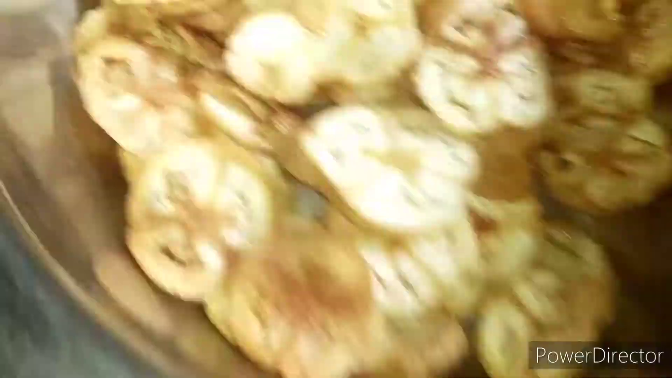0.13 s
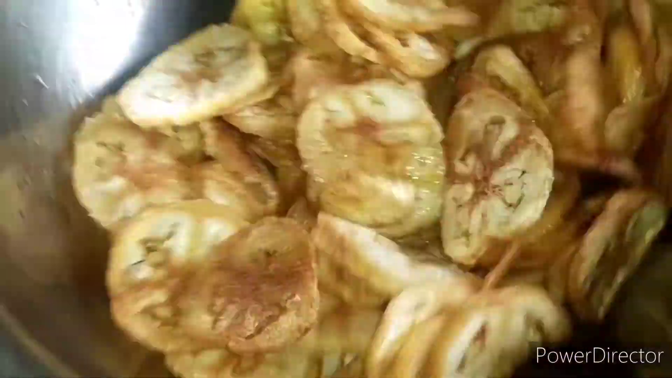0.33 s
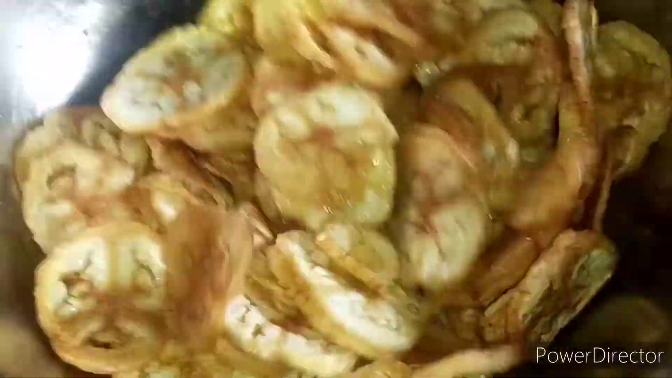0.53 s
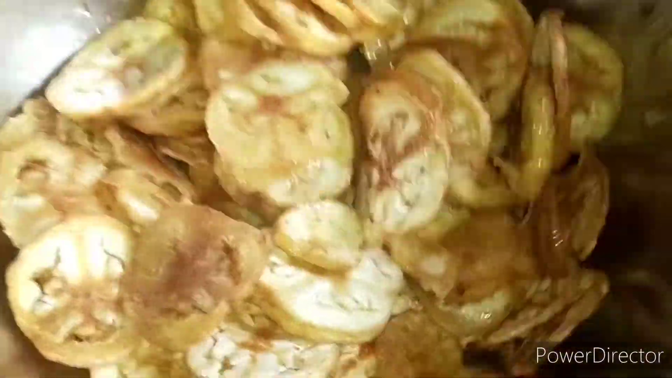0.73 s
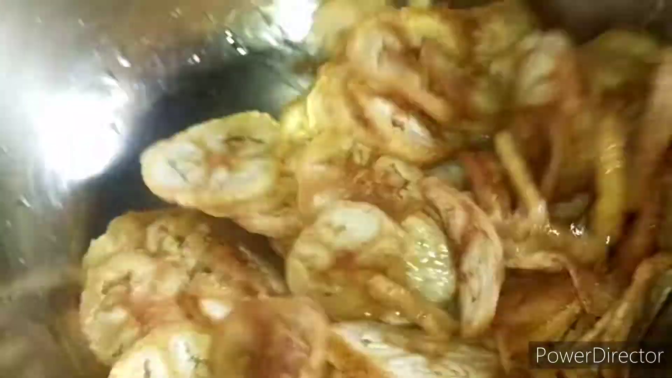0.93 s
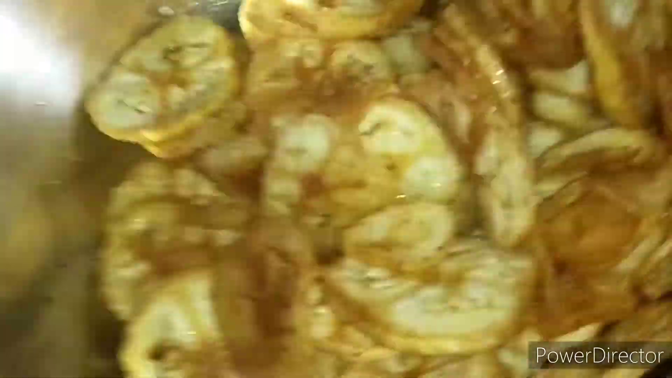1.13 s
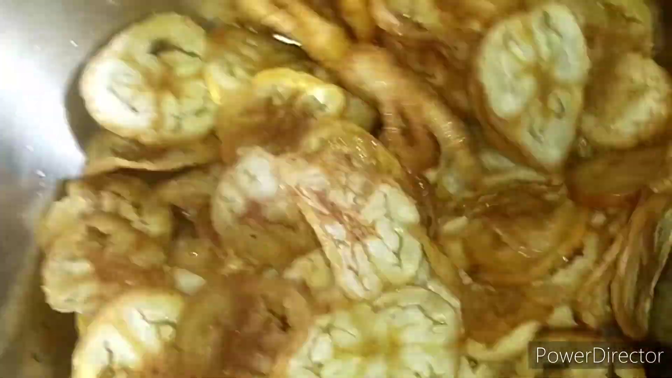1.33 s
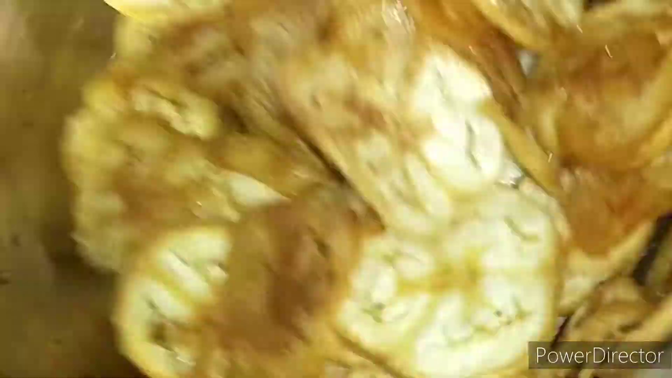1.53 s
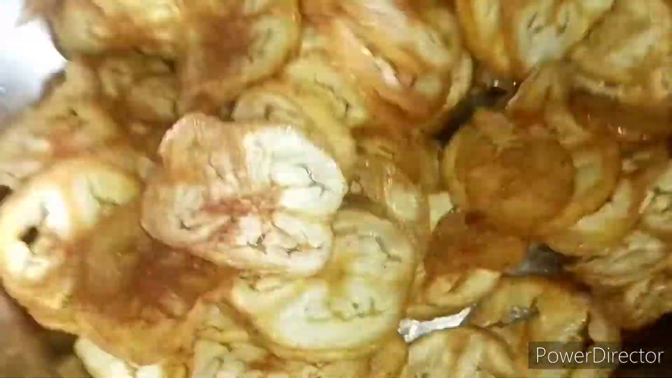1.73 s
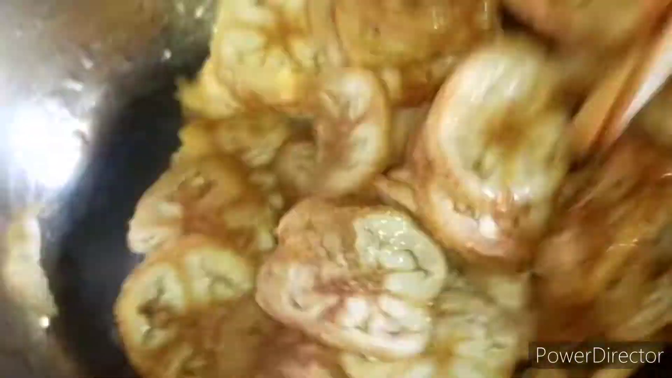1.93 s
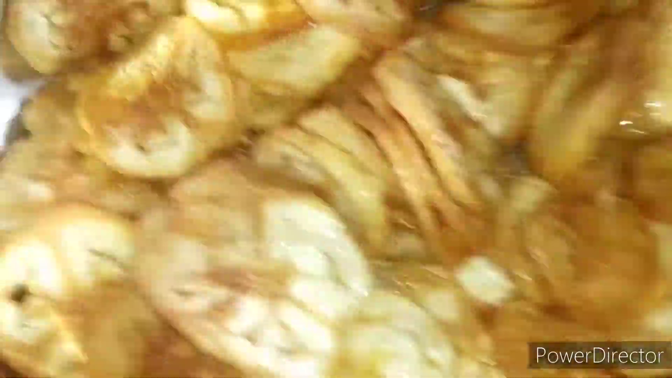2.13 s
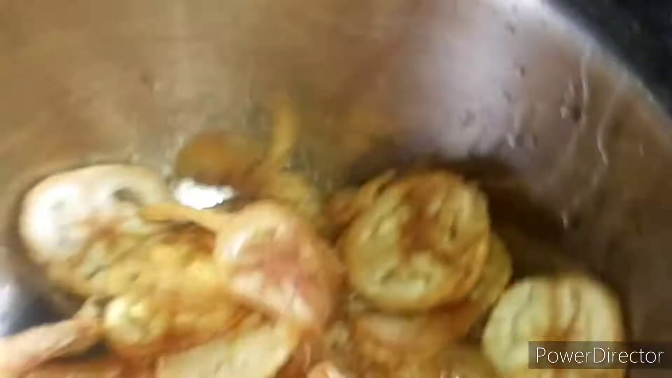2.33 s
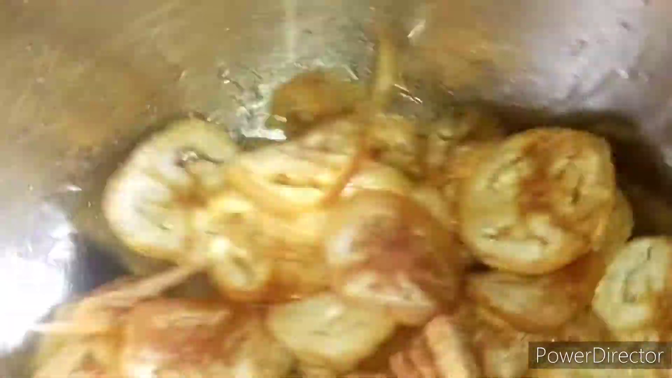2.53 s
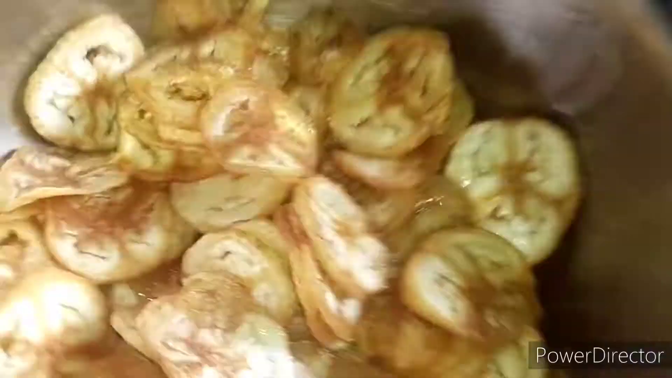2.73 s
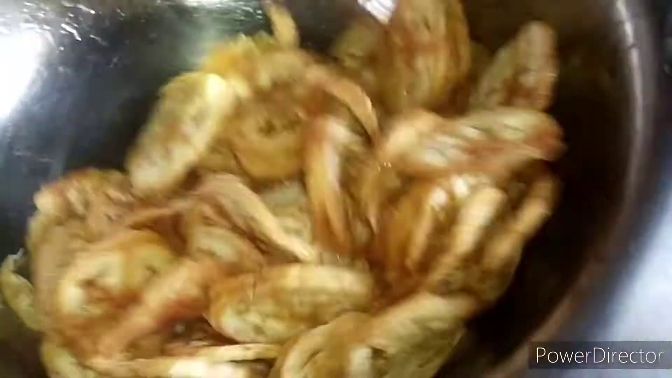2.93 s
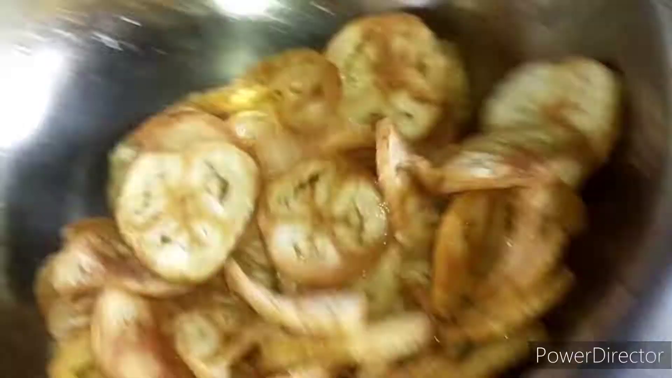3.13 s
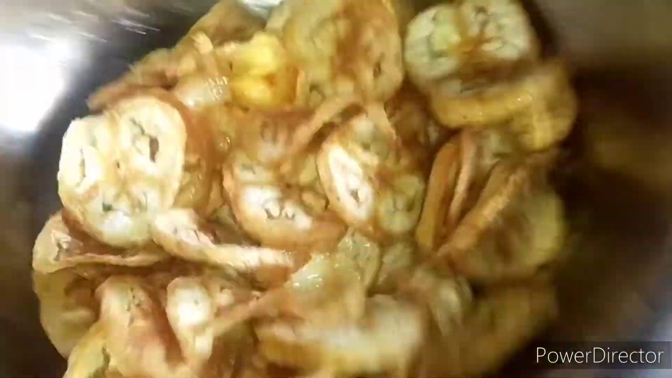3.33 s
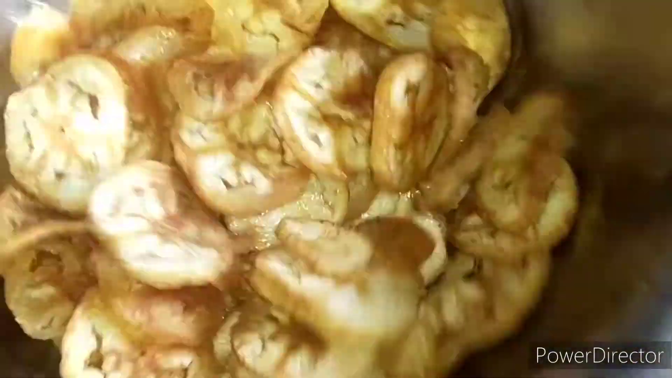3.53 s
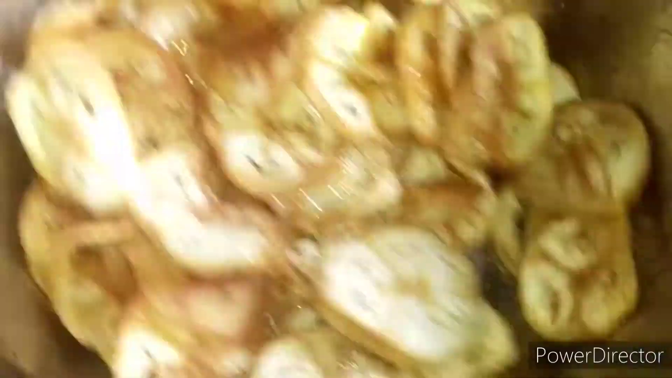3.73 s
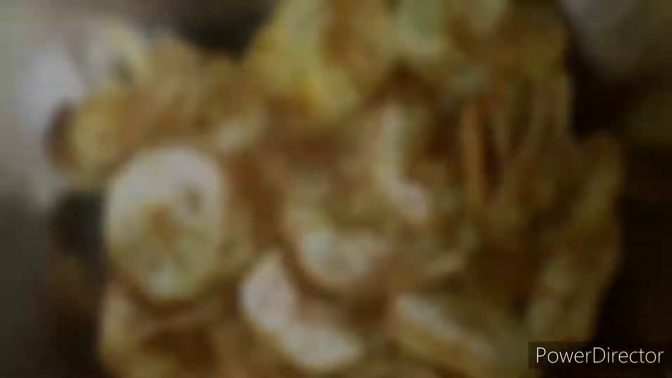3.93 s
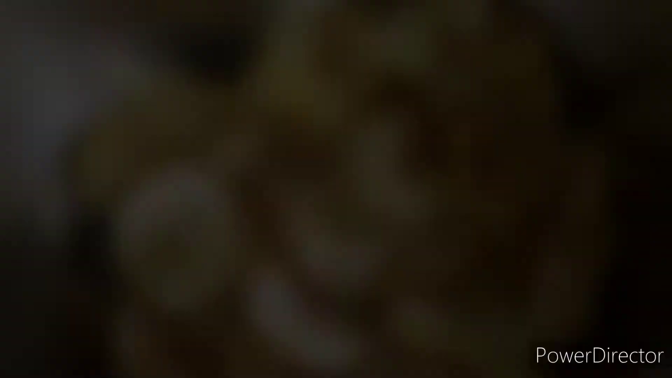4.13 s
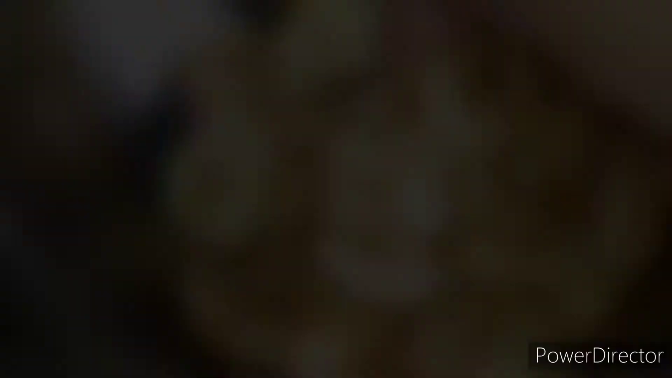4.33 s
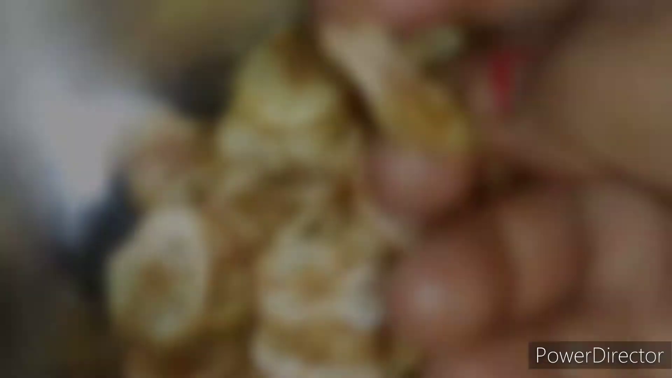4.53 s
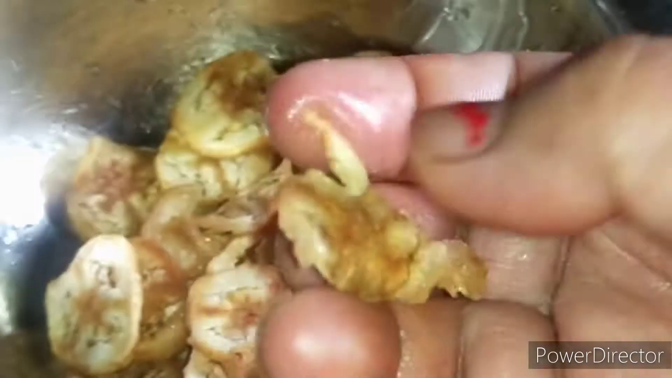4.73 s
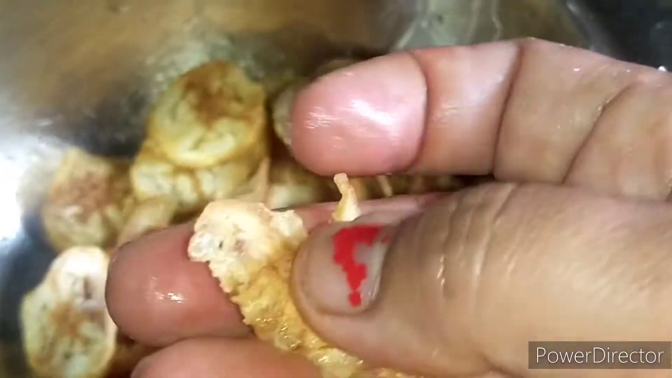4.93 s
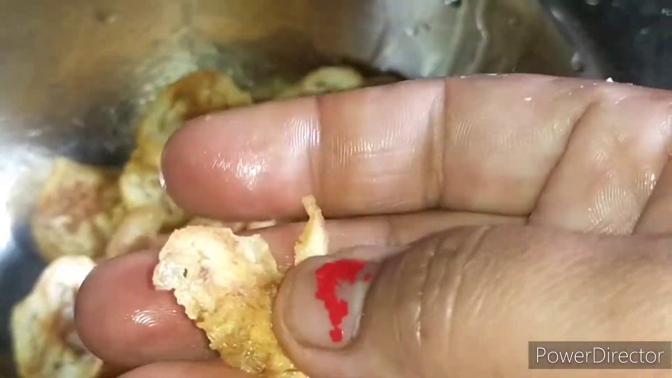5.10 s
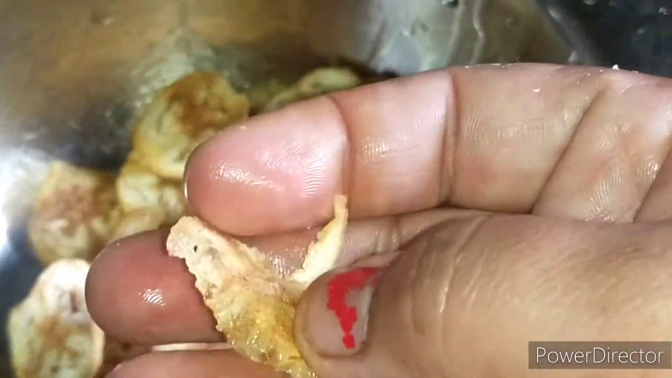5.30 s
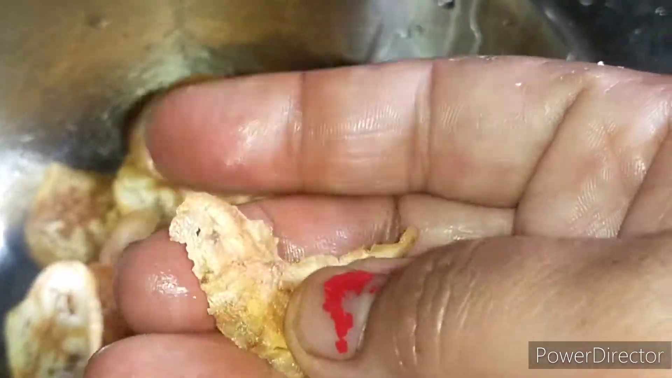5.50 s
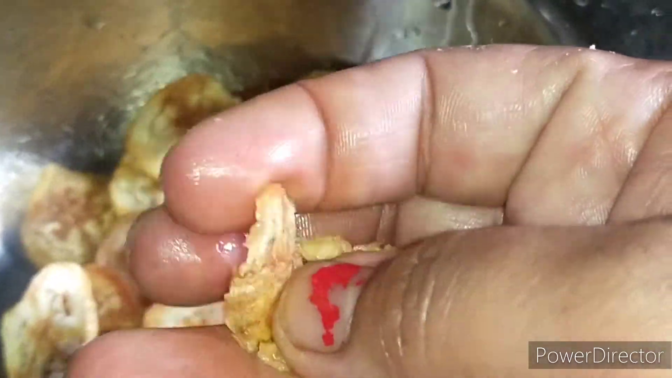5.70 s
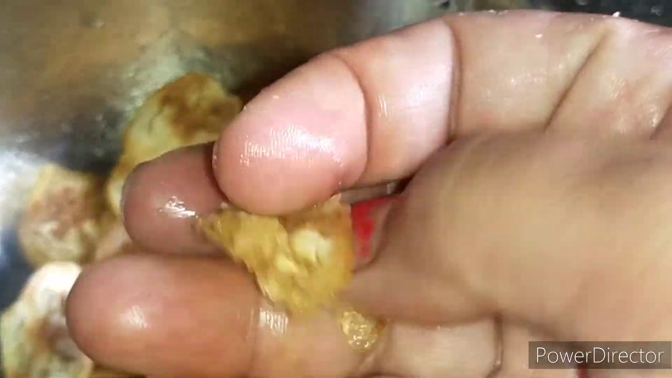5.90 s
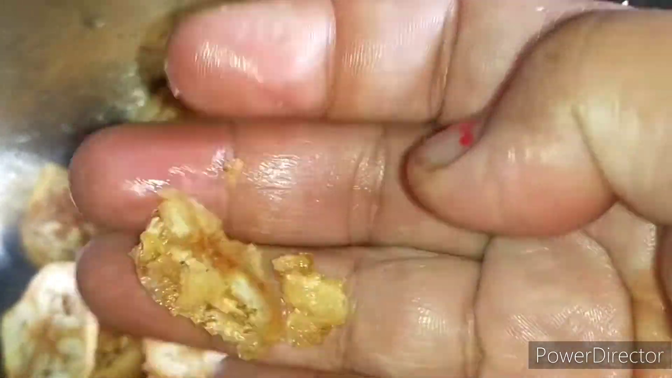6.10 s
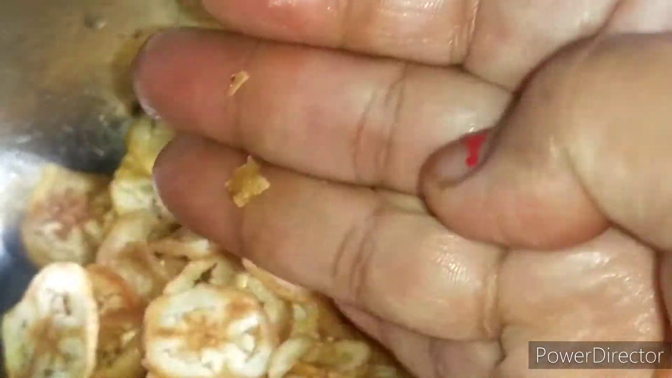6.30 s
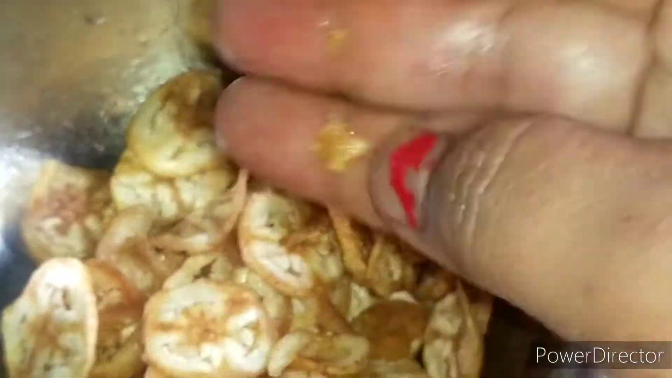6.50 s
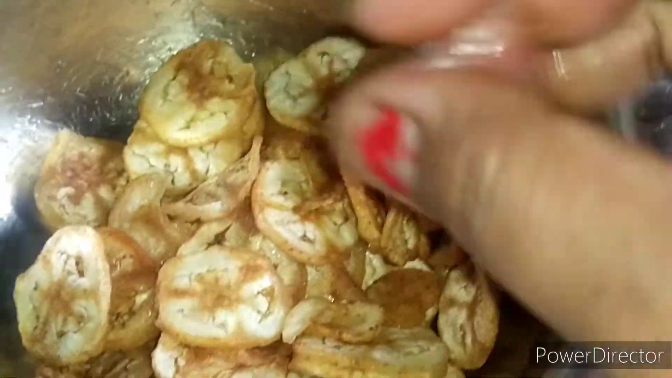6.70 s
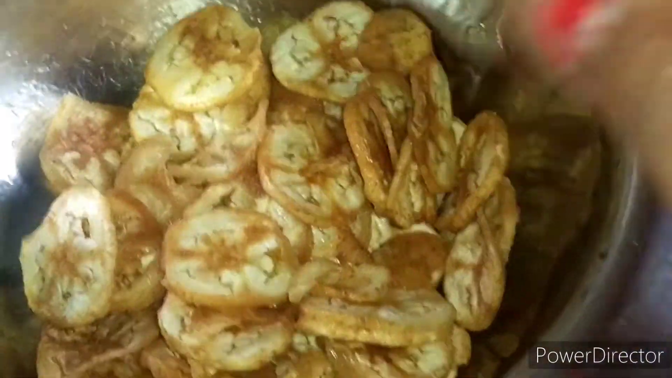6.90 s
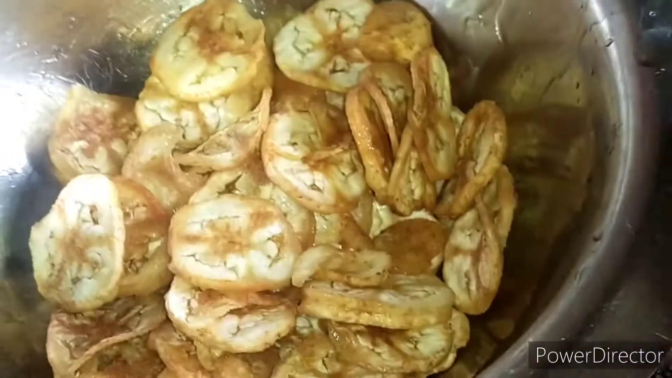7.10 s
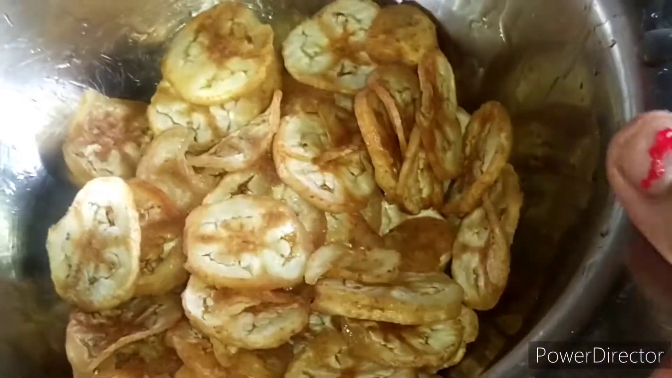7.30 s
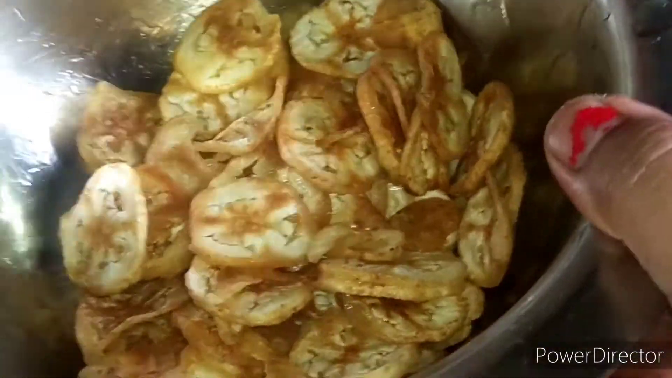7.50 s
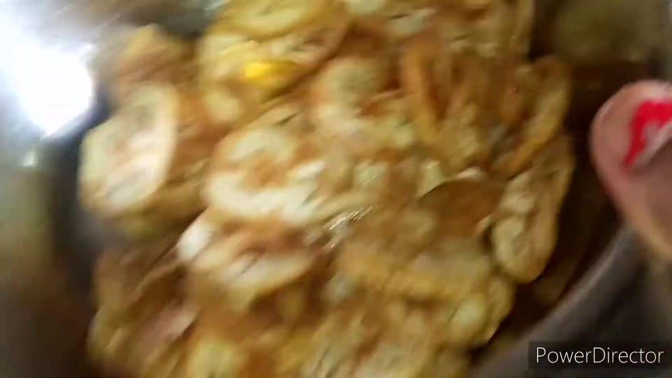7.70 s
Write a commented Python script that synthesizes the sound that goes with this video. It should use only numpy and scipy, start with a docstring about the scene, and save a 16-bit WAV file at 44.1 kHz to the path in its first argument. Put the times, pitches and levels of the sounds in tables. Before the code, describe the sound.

Dry chips tossed noisily in a metal bowl with a few counter knocks, then near-quiet, one chip cracking between fingers, and a far rumble with horn.

```python
"""In a quiet kitchen, crisp chips slide and tumble in a hand-held steel bowl close to a two-port phone.
Random contacts and single ticks excite the bowl's damped resonances; in two moments it knocks on the counter.
At 4.313 s an abrupt cut ends the tossing: a clink of decaying steel tones dies away, and fingers crush
one chip, made from sharp cracks and bursts of filtered crackle. Soft rustles follow as a far vehicle
rumbles by: a wavering hum, resonant noise and thin, rough horn-like tones."""
import sys
import numpy as np
from scipy import signal
from scipy.fft import rfft, irfft
from scipy.io import wavfile
from scipy.ndimage import uniform_filter1d

SR = 44100
rng = np.random.default_rng(int(sys.argv[2]) if len(sys.argv) > 2 else 0)


def inscribe(sig):
    """Save sig as 16-bit PCM at rate SR to the path in sys.argv[1].

    A 1-D sig is mono; a 2-D sig holds one channel per row.
    Samples are clipped to [-1, 1] before scaling.
    """
    pcm = np.round(np.clip(np.atleast_2d(sig).T, -1, 1) * 32767)
    wavfile.write(sys.argv[1], SR, pcm.astype(np.int16))


N = 341775
T = np.arange(N) / SR
CUT_S = 4.313  # the tossing ends and the clink begins

# bowl base hitting the counter: t/s, thud peak level/dB, mid clack peak level/dB,
# rocking level in the counter/dB, rocking level in the upper bowl modes/dB
KNOCKS = [(1.376, -24.5, -11, -36.5, -41), (1.468, -22, -19.5, -32, -31), (4.172, -16, -17, -35, -51),
          (4.208, -18, -22, -37.5, -56.5)]
# lowest bowl modes, split by the hand and the load: f/Hz, relative level/dB,
# time to fall 60 dB when not pressed or damped further/s, phase by which the left leads/rad
BOWL_LOW = [(860, -28, .04, -.3), (861, -2.5, 0.36, -0.85), (889.5, 11, 0.083, -0.46), (924.7, 5, 0.12, -1),
            (968, -51.5, .04, -0.45)]
# upper bowl modes: f/Hz, relative level/dB, time to fall 60 dB/s, phase by which the left leads/rad
BOWL_HIGH = [(1363, -12, 0.15, 1), (1440, -11.5, 0.11, 2), (1665, -4.5, 0.059, 5), (2242, -1.5, .07, -1.25),
             (2282, -5, 0.058, -0.5), (3260, -5.5, 0.12, 3.5), (3310, -5, 0.044, 2.5),
             (3360, -5, 0.084, 1.5), (4740, -10.5, 0.14, 2.2), (4920, -5.5, 0.045, 5), (6300, -12, .08, 2),
             (6477, -7, 0.18, 1.5), (6650, -11, .06, 5), (7890, -16, .07, -3.5)]


def undb(db):
    """Turn decibels into a gain."""
    return 10 ** (np.asarray(db) / 20)


def level(x, db):
    """Scale a sound to an rms level in dB."""
    return x * undb(db) / np.sqrt(np.mean(x ** 2))


def pan(db):
    """Gains of left and right for a left-minus-right difference in dB."""
    return undb(np.array([db, -db]) / 2)


def curves(table):
    """Join each table column over time, giving one value per sample."""
    s, *columns = np.transpose(table)
    return [np.interp(T, s, column) for column in columns]


def on_log_hz(points, size):
    """Join points on a log-frequency axis, at the bins of a transform."""
    hz, value = np.transpose(points)
    bins_hz = np.fft.rfftfreq(size, 1 / SR)
    return np.interp(np.log(bins_hz + 1), np.log(hz), value)


def colour(x, points):
    """Shape the spectrum with a filter that never responds before its input (folded cepstrum)."""
    size = 4096
    cepstrum = irfft(np.log(undb(on_log_hz(points, size))), size)
    cepstrum[1:size // 2] *= 2
    cepstrum[size // 2 + 1:] = 0
    response = irfft(np.exp(rfft(cepstrum)), size)
    return signal.oaconvolve(x, response[None], axes=1)[:, :N]


def butter(x, order, hz, kind="low"):
    """Keep the low, high or middle band of a sound."""
    return signal.sosfilt(signal.butter(order, hz, kind, fs=SR, output="sos"), x)


def mode(x, hz, t60):
    """One resonance: a complex pointer that turns at its pitch and shrinks 60 dB in t60 seconds."""
    return signal.lfilter([1], [1, -np.exp((2j * np.pi * hz - np.log(1000) / t60) / SR)], x)


def ring(x, modes):
    """Sum the resonances in stereo; each reaches the two ports with its own phase."""
    total = 0
    for hz, db, t60, lead in modes:
        turn = np.exp(.5j * lead * np.array([[1], [-1]]))
        total = total + undb(db) * np.imag(mode(x, hz, t60) * turn)
    return total


def soft(x):
    """A rounded contact feeds only the lowest bowl modes; the small bowl radiates no bass."""
    return butter(x, 4, [740, 1100], "band")


def walk(rate):
    """Slow random wander with a spread near 1: held random values, smoothed twice."""
    k = int(SR / rate)
    steps = np.repeat(rng.standard_normal(N // k + 1), k)
    return 1.3 * uniform_filter1d(uniform_filter1d(steps, k), k)[:N]


def grains(rate, spread_db, lag_s):
    """Random impacts of uneven size and place, reaching the ports up to lag_s apart; rate is per second."""
    when, rank, sign, spot = rng.random((int(rate * N / SR), 4)).T
    size = undb(-spread_db * np.log(np.maximum(rank, .01))) * np.sign(sign - .5)
    shift = np.clip((spot - .5) * lag_s * SR, -90, 90)  # samples
    start = when * (N - 200) + 100
    return np.array([np.bincount((start + side * shift).astype(int), size, N) for side in (1, -1)])


def swells(s, rise, fall, db):
    """Gain of events that climb 20 dB in their rise time and sink 20 dB in their fall time; powers add."""
    t = T[::32, None] - s  # a coarse time grid is enough
    slope = np.where(t < 0, t / np.maximum(rise, .002), -t / np.maximum(fall, .002))
    power = undb(2 * db) * 100. ** slope
    return np.interp(T, T[::32], np.sqrt(power.sum(axis=1)))


def kitchen():
    """Steady room noise, more alike at both ports in the bass, and a wavering hum from narrow noise."""
    # room noise: f/Hz, relative level per Hz/dB
    spectrum = [(15, -82), (25, -41.5), (111, -1.5), (142, -14.5), (349, -10), (399, -19.5), (445, -15),
                (496, -13.5), (538, -14.5), (2530, -27.5), (3060, -27), (5570, -33), (6920, -27.5),
                (15200, -37.5), (16500, -56.5)]
    # likeness of the ports: f/Hz, left-right correlation [no unit]
    likeness = [(25, 0.81), (100, 1), (300, .9), (1000, 0.2), (3000, 0.15), (16000, 0.076)]
    like = np.clip(on_log_hz(likeness, N), 0, 1)
    noise = rfft(rng.standard_normal((2, N))) * undb(on_log_hz(spectrum, N))
    mid, side = noise * np.sqrt([1 + like, 1 - like])
    hush = level(irfft([mid + side, mid - side], N), -56) * undb(.8 * walk(4.0))
    hum = level(mode(rng.standard_normal(N), 110, 0.089).imag, -64)
    return hush + hum


def sliding():
    """Dense chip contacts ring the bowl, scrape on it and tick against each other."""
    # shakes, each a surge of sliding chips: peak t/s, rise t/s, fall t/s, then relative levels of
    # bowl ring/dB, upper modes/dB, mid scrape/dB, crisp ticks/dB
    shakes = [(0.05, 0.26, 0.31, -58, -60, -52, -54), (0.28, 0.042, .15, -32.5, -50, -38.5, -37.5),
              (0.408, 0.13, 0.067, -26, -37, -29.5, -36.5), (0.525, 0.068, 0.06, -20, -29.5, -25, -29.5),
              (0.626, 0.22, 0.083, -26, -35, -28.5, -31), (0.732, 0.12, 0.17, -25.5, -38.5, -31.5, -33.5),
              (0.81, .03, 0.13, -44, -44, -38, -41.5), (0.93, 0.12, 0.057, -35.5, -51, -39.5, -42.5),
              (1.0, 0.12, 0.072, -53, -51.5, -42, -40.5), (1.059, 0.026, .15, -16, -19, -22, -27),
              (1.112, 0.13, 0.2, -28.5, -46, -32, -38), (1.331, 0.11, 0.18, -40.5, -49, -42, -42),
              (1.38, .005, .03, -24.5, -22.5, -31, -23.5), (1.48, 0.037, .19, -15.5, -26, -40, -38),
              (1.7, 0.054, .06, -43, -43, -38.5, -39.5), (1.76, 0.042, 0.14, -16.5, -22.5, -19, -22.5),
              (1.87, 0.12, 0.068, -25.5, -49, -33, -33), (2.02, 0.068, 0.043, -50, -58.5, -43.5, -42),
              (2.096, 0.04, 0.073, -10, -19, -15.5, -17), (2.259, 0.32, 0.058, -29.5, -40.5, -36, -36.5),
              (2.35, 0.079, .06, -45, -47, -37.5, -40), (2.408, 0.058, 0.14, -15.5, -20.5, -21.5, -22),
              (2.73, 0.091, 0.057, -33, -36.5, -37, -38.5), (2.88, .2, 0.084, -30.5, -36, -35.5, -36.5),
              (3.0, 0.078, 0.21, -25.5, -30.5, -32, -33.5), (3.131, 0.064, 0.31, -18.5, -34, -24.5, -28.5),
              (3.26, 0.052, 0.065, -21, -34, -26, -23.5), (3.45, 0.39, 0.3, -29.5, -41, -28, -31),
              (3.6, 0.12, 0.29, -26, -50, -33, -33), (3.718, 0.24, 0.048, -25.5, -34.5, -28.5, -34.5),
              (3.82, 0.068, 0.13, -29.5, -42, -29, -32.5), (3.885, 0.022, 0.13, -30, -42, -30, -32),
              (3.95, 0.088, .14, -34, -46.5, -34, -40), (4.177, 0.0046, .025, -24, -28.5, -31, -25),
              (4.225, 0.045, 0.11, -24.5, -40.5, -43, -42.5)]
    # scrape spectrum: f/Hz, relative level per Hz/dB
    scrape_colour = [(650, -35.5), (1100, -16), (1230, -4.5), (1360, 6.5), (1510, 3.5), (2250, 2.5),
                     (3080, 2), (3380, 4.5), (6000, -8.5), (7800, -48.5), (13200, -120)]
    # crisp tick spectrum: f/Hz, relative level per Hz/dB
    crisp_colour = [(3240, -47), (5500, -15), (6670, 4.5), (8630, -6), (9460, -5), (13100, -8.5),
                    (15100, -2), (16100, -16), (16500, -46.5)]
    # faint low tone that comes with the sliding: t/s, relative level/dB
    drone_curve = [(0.07, -79), (0.19, -59), (0.74, -57.5), (1.0, -77), (1.45, -56), (1.9, -63), (2.3, -72),
                   (2.45, -62), (2.89, -53), (3.3, -64), (4.1, -66)]
    s, rise, fall, low_db, high_db, mid_db, crisp_db = np.transpose(shakes)
    pushes = soft(grains(1500, 3.0, .00005)[0])
    rubs = grains(3000, 1.6, .0008)

    # the first second of steady contacts sets the scale of each ring
    low = ring(pushes * swells(s, rise, fall, low_db), BOWL_LOW)
    low = low * undb(-3.5) / np.std(ring(pushes[:SR], BOWL_LOW))

    # the contact spot wanders, so each upper mode flares and fades on its own
    upper = butter(rubs[0], 2, 1100, "high")
    clang = upper * swells(s, rise, fall, high_db)
    high = sum(ring(clang * undb(3 * walk(30)), [one_mode]) for one_mode in BOWL_HIGH)
    high = high * undb(-2.5) / np.std(ring(upper[:SR], BOWL_HIGH))

    scrape = level(colour(rubs, scrape_colour), -4.5) * swells(s, rise, fall, mid_db)

    # ticks cluster as chips slip; small and large pieces tick bright and dull on their own
    dull, bright = (colour(grains(1500, 3.0, 0.00065), crisp_colour) * undb(4.84 * walk(60))
                    for _ in range(2))
    crisp = level(butter(dull, 2, 10000) + bright - butter(bright, 2, 10000), -0.4)
    # loose chips start and settle at their own pace
    crisp = crisp * swells(s, 0.92 * rise, 0.7 * fall, crisp_db)

    drone = level(mode(rng.standard_normal(N), 247.5, 0.6).imag, -1.7) * undb(curves(drone_curve)[0])
    return low + (high + scrape) * pan(1.75)[:, None] + crisp * pan(7.5)[:, None] + drone


def ticks():
    """Each small sound is a sharp noise crack with a short noisy tail, filtered around its centre."""
    # The next three tables share columns: t/s, relative peak level/dB, centre f/Hz, left minus right
    # level/dB, band edges as ratio to the centre (at least 1.1 is used) [no unit].
    # single chip ticks in the bowl
    chip_ticks = [(0.2468, -37, 2330, 5, 1.55), (0.2663, -29, 6640, 4.5, 1.55),
                  (0.274, -16.5, 6550, 10, 1.3), (0.338, -29, 7420, 6, 1.55), (0.3606, -25, 3000, 6, 1.55),
                  (0.4748, -28, 3390, -3, 1.55), (0.4833, -25, 2260, 11, 1.6), (0.516, -18.5, 2240, 8, 1.7),
                  (0.5651, -11, 6660, 8, 1.5), (0.629, -19, 2250, 6, 1.47), (0.6985, -24.5, 2250, 8, 1.55),
                  (0.7227, -21, 6760, 4.0, 1.55), (0.802, -16, 9600, 8.5, 1.55),
                  (0.8474, -23, 14400, 7.5, 1.55), (0.9722, -33, 6740, 5.5, 1.55),
                  (1.057, -17, 2190, 7.5, 1.2), (1.0658, -15, 2200, 7, 1.4), (1.0756, -8.5, 2270, -2, 1.55),
                  (1.105, 0, 5800, 2, 1.48), (1.2974, -32, 2280, 1.5, 1.3), (1.3568, -19.5, 2220, 0, 1.8),
                  (1.3782, -14, 2380, 2, 1.4), (1.3792, -19, 3420, 1.5, 1.55), (1.468, -23, 6440, 2, 1.7),
                  (1.494, -16, 2230, 2, 1.7), (1.5404, -23, 2230, 9, 1.4), (1.675, -31, 2250, 2.5, 1.7),
                  (1.685, -30, 1890, 1.0, 1.55), (1.722, -33, 3400, -0.5, 1.55),
                  (1.7427, -19, 2240, 2.0, 1.4), (1.7543, -15, 4850, -3, 1.6), (1.7635, -15, 2100, -4, 1.7),
                  (1.8616, -16.5, 2160, -0.5, 1.55), (1.9978, -30, 6730, 4.0, 1.55),
                  (2.0437, -24, 2290, -3, 1.55), (2.0657, -18, 2270, 5, 1.55), (2.073, -18, 2260, 3.5, 1.4),
                  (2.0904, -15, 2260, 3.5, 1.55), (2.3236, -28, 7080, 3.5, 1.55),
                  (2.345, -23, 2260, 4, 1.55), (2.355, -23, 2240, 4, 1.4), (2.374, -18, 7030, 7.5, 1.3),
                  (2.3855, -9.5, 2300, 2.5, 1.7), (2.4074, -4, 2180, 5, 1.5), (2.4605, -7.5, 8600, 7, 1.5),
                  (2.574, -34, 2290, 2.0, 1.4), (2.6234, -38, 2250, 1.5, 1.55), (2.676, -29, 7240, 2, 1.4),
                  (2.727, -23.5, 2230, 3, 1.6), (2.802, -39, 6550, 1, 1.55), (2.8394, -26, 2220, 4.5, 1.55),
                  (2.8704, -25, 7610, 7.0, 1.55), (2.9467, -29, 3350, 5.0, 1.55),
                  (2.9756, -23, 2260, 3, 1.4), (3.034, -23, 6640, 4.5, 1.4), (3.1292, -18, 2270, -1, 1.6),
                  (3.2398, -18, 1990, 4, 1.6), (3.3577, -20, 14800, 8, 1.55), (3.395, -19, 3420, 2.5, 1.4),
                  (3.4074, -10.5, 7900, 8, 1.5), (3.4423, -9.5, 3400, 6, 1.4),
                  (3.5797, -27, 3380, 2.5, 1.55), (3.612, -23, 14500, 7, 1.4), (3.6411, -12, 3450, 6, 1.45),
                  (3.6922, -20, 3410, 2.5, 1.55), (3.793, -26, 2720, 4, 1.55),
                  (3.797, -19.5, 2820, 0, 1.55), (3.8162, -24, 3080, 1, 1.55), (3.8272, -21, 7360, 3, 1.55),
                  (3.886, -13, 3330, 4.0, 1.5), (3.9464, -16, 4800, 0, 1.55), (4.0127, -26, 15000, 5, 1.55),
                  (4.067, -28, 14500, 10, 1.6), (4.1729, -18, 2210, 10, 1.3),
                  (4.2118, -27, 1910, 4.5, 1.55)]
    # cracks of the chip between the fingers
    finger_cracks = [(4.4157, -29.5, 9590, 4, 1.86), (4.7483, -30.5, 9600, 2, 1.55),
                     (5.0647, -46, 7120, -2.5, 1.7), (5.2029, -44, 9210, 0.5, 1.7),
                     (5.3735, -40.5, 8640, -3.0, 1.7), (5.393, -24.5, 9210, -5, 1.95),
                     (5.5182, -36, 9200, -7, 1.7), (5.5462, -33, 8950, -4.5, 1.13),
                     (5.7651, -35.5, 7260, 6, 1.6), (5.7878, -30, 7310, 1, 1.3),
                     (5.8345, -37, 14800, 2, 1.7), (5.8699, -36, 6700, -1.5, 1.7),
                     (5.9222, -29, 9160, -2.0, 1.7), (5.99, -39.5, 2780, -7, 1.7),
                     (6.0266, -42.5, 2660, -7, 1.9), (6.1507, -43, 2610, -3, 1.7),
                     (6.3957, -33.5, 1940, -10.5, 1.55), (6.4281, -39, 2650, -4.0, 1.9),
                     (6.4517, -32, 4000, -4.5, 2)]
    # soft rustles of the hand at the rim
    hand_rustles = [(6.863, -41.5, 5000, -3, 1.6), (7.149, -46, 2000, -7, 1.7), (7.249, -49, 4350, -5, 1.1),
                    (7.355, -31, 15100, 8, 0.92), (7.354, -37, 5500, -3, 1.5), (7.556, -40, 1300, -7, 1.66),
                    (7.605, -46, 6900, -9, 0.81), (7.649, -43, 4920, -10, 1.4),
                    (7.677, -39.5, 4860, -8, 1.2), (7.71, -47, 2100, -1, 1.4)]
    out, t = np.zeros((2, N + SR)), T[:3000]
    shape = np.exp(-t / 0.00021) + 0.27 * 1000. ** (-t / 0.05)
    for s, db, hz, pan_db, ratio in chip_ticks + finger_cracks + hand_rustles:
        noise = rng.standard_normal((3, len(t)))
        crack = (noise[0] + 4.3 * noise[1:]) * shape  # a shared part and one for each port
        ratio = max(ratio, 1.1)
        crack = butter(crack, 2, [hz / ratio, min(hz * ratio, .45 * SR)], "band")
        gain = undb(db + 1.0) / abs(crack).max()
        out[:, int(s * SR):int(s * SR) + len(t)] += crack * gain * pan(pan_db)[:, None]
    return out[:, :N]


def landings():
    """Heavier chips knock the bowl: a damped bump, a share that rings on, and the upper modes."""
    # chips landing on the steel: t/s, relative ring level/dB, upper modes relative to it/dB
    chip_landings = [(0.287, -28, -13), (0.393, -24.5, -10), (0.484, -23.5, -13), (0.517, -21, -13),
                     (0.607, -25, -10), (0.701, -20.5, -6), (0.724, -23, -9), (1.049, -14, -6),
                     (1.073, -15.5, -15), (1.105, -16, -10.5), (1.379, 0.5, -7), (1.401, -20, -15),
                     (1.423, -19, -9.5), (1.47, -4.5, -14), (1.501, -13, -30), (1.563, -14.5, -27.5),
                     (1.724, -22.5, -10), (1.746, -13.5, -13), (1.776, -11.5, -15.5), (2.052, -21.5, -15.5),
                     (2.074, -8.5, -11.5), (2.094, -3.5, -13.5), (2.346, -25.5, -9), (2.396, -11.5, 1),
                     (2.875, -42, -13), (2.987, -26.5, -9), (3.006, -19.5, -19), (3.1, -24.5, -17),
                     (3.128, -13, -26), (3.171, -15, -10), (3.199, -25, -13), (3.258, -16, -13),
                     (3.355, -20.5, -4.5), (3.389, -19.5, -10), (3.426, -23, -17), (3.484, -20, -4),
                     (3.52, -20, -13), (3.64, -28, -4), (3.735, -21, -20), (3.823, -35, -13),
                     (3.88, -22, -11), (3.948, -26, -12), (4.173, -7.5, -5), (4.212, -9.5, -8)]
    s, db, high_db = np.transpose(chip_landings)
    # near a knock, the base touches the counter and damps the bowl
    pressed = np.any(abs(s[:, None] - np.transpose(KNOCKS)[0]) < .01, axis=1)
    share = np.where(pressed, .03, 0.81)  # part of the landing that the load lets ring on
    at = (s * SR).astype(int)
    early = at - int(.002 * SR)  # the rounded push starts before its peak

    def push(gain, ring_factor):
        """Push the lowest modes, with their ringing times scaled."""
        modes = [(hz, d, ring_factor * t60, lead) for hz, d, t60, lead in BOWL_LOW]
        return ring(soft(np.bincount(early, undb(db) * gain, N)), modes)

    bump = push((1 - share) * ~pressed, .4)
    clunk = push(pressed, 0.2)
    rings = push(share, 1)
    hits = np.bincount(at, undb(db + high_db - 12.5 * pressed), N)
    upper = ring(butter(hits, 2, 1500, "high"), BOWL_HIGH)
    return undb(-12.5) * clunk + undb(-17.5) * bump + undb(-14.0) * rings + undb(-6) * upper


def counter(x):
    """Ring the counter's dull, quickly fading resonances."""
    # counter modes: f/Hz, relative level/dB, share of a 0.043 s fall of 60 dB [no unit]
    counter_modes = [(190, -14, .8), (270, -14, .9), (388, 2.5, 0.99), (442.5, -14.5, 0.85),
                     (546, 7.5, 1.7), (624, -2, 0.613), (1340, 1, 0.55), (1760, -2.5, .4),
                     (2100, -11.5, 0.36)]
    x = butter(x, 2, 200, "high")
    return sum(undb(db) * mode(x, hz, 0.043 * share).imag for hz, db, share in counter_modes)


def knocks():
    """The bowl base hits the counter and rocks on: impacts and chatter excite both."""
    mids_hz = [1100, 2450]
    out, t = np.zeros(N), T[:SR // 4]
    for s, db, clack_db, *_ in KNOCKS:
        thud = rng.standard_normal(len(t)) * (np.exp(-t / 0.00052) + 0.019 * 1000. ** (-t / .1))
        thud = counter(thud)
        clack = rng.standard_normal(len(t)) * (np.exp(-t / 0.0021) + 0.14 * 1000. ** (-t / 0.18))
        clack = butter(clack, 2, mids_hz, "band")
        hit = thud * undb(db) / abs(thud).max() + clack * undb(clack_db) / abs(clack).max()
        out[int(s * SR):int(s * SR) + len(t)] += hit

    chatter = grains(900, 2.5, .0001)
    s, _, _, counter_db, steel_db = np.transpose(KNOCKS)
    delay_s, rise_s = .015, 0.025
    rocking = swells(s + delay_s, rise_s, .2, counter_db)
    dull = counter(chatter * rocking) / np.std(counter(chatter[0, :SR]))
    # clatter of the rocking in the middle band
    dull += level(butter(chatter, 2, mids_hz, "band"), -5.5) * rocking

    # hard contact with the counter makes the upper modes clang without scrape noise
    hard = butter(chatter[0], 1, [2000, 4500], "band")
    clang = ring(hard * swells(s + delay_s, rise_s, 0.12, steel_db), BOWL_HIGH)
    return out + dull + clang / np.std(ring(hard[:SR], BOWL_HIGH))


def clink():
    """Free steel rings out from the cut as a sum of decaying sine tones."""
    # steel tones: f/Hz, relative level/dB, time to fall 60 dB/s
    steel_tones = [(2690, -15, .4), (2864, -6, .75), (3266, -14, .5), (3564, -6, .5), (3590, -14, .4),
                   (3750, -3, .36), (3919, -12, .2), (4005, -11, .4), (4152, 0, .42), (4562, -15, .4),
                   (4620, -12, .45), (6374, -9, .3), (6391, -4, .38), (6907, -18, .4), (8366, -18, .3)]
    after = np.maximum(T - CUT_S, 0)
    phases = rng.random((len(steel_tones), 1, 1)) * 2 * np.pi + np.array([[.8], [-.8]])
    tones = 0
    for (hz, db, t60), phase in zip(steel_tones, phases):
        tones = tones + undb(db) * 1000. ** (-after / t60) * np.sin(2 * np.pi * hz * after + phase)
    fade_in = np.minimum(after / 0.0021, 1)
    return undb(-46) * fade_in * tones * pan(-6)[:, None]


def crumbs():
    """Fine crackle of the chip giving way; large and small crumbs sound dull and bright."""
    # bursts of crumbs under the fingers: peak t/s, fall t/s, relative dull level/dB, bright level/dB
    bursts = [(4.75, 0.034, -60, -52), (5.07, .05, -67, -59.5), (5.395, .12, -52, -55.5),
              (5.52, 0.24, -55.5, -49.5), (5.79, 0.049, -51, -39.5), (5.84, .15, -57, -49.5),
              (5.93, 0.13, -46.5, -45.5), (6.03, 0.35, -53, -55.5), (6.4, .03, -41, -51),
              (6.45, 0.21, -46.5, -52.5), (6.87, 0.082, -57, -67), (7.04, .15, -63, -79),
              (7.16, .5, -51.5, -66), (7.355, 0.19, -51.5, -60), (7.6, .3, -51, -55.5),
              (7.67, 0.13, -54, -59)]
    # crackle spectrum: f/Hz, relative level per Hz/dB
    crumb_colour = [(900, -39), (1600, -6), (3000, -3.5), (5500, -9.5), (8900, -9.5), (11500, -21),
                    (14500, -14), (16200, -12)]
    s, fall, dull_db, bright_db = np.transpose(bursts)
    crackle = colour(grains(4000, 1.8, .0006), crumb_colour)
    dull = level(butter(crackle, 3, 8000), -5.0)
    bright = level(butter(crackle, 3, 8000, "high"), 0)
    rise_s = 0.012
    return dull * swells(s, rise_s, fall, dull_db) + bright * swells(s, rise_s, fall, bright_db)


def vehicle():
    """A wavering hum, deep rumble, noise in boomy resonances and thin, rough horn-like tones."""
    # far vehicle: t/s, hum level/dB, relative rumble level/dB, relative boom level/dB
    passing = [(6.5, -74, -69, -71), (6.8, -71, -74, -78.5), (6.88, -65, -52, -59), (7.1, -67.5, -67, -66),
               (7.168, -42.5, -46, -46.5), (7.2, -50, -43, -48), (7.235, -40.5, -37, -47),
               (7.28, -46, -52, -48), (7.36, -46, -56, -48.5), (7.48, -64, -55, -57.5),
               (7.64, -52, -53, -50.5), (7.75, -58, -68, -57)]
    # boomy resonances: f/Hz, width f/Hz, relative level/dB
    boom_modes = [(250, 18, -8), (348, 36, 0), (534, 67, -11.5), (729, 24.4, -6)]
    # horn loudness: t/s, relative lower pair level/dB, relative upper pair level/dB
    horn_curve = [(6.68, -81, -90), (6.75, -71, -84), (6.85, -61, -72.5), (6.93, -57, -71),
                  (7.09, -57, -66), (7.15, -55, -58), (7.25, -52.5, -60), (7.39, -51.5, -64),
                  (7.49, -59.5, -55), (7.75, -56, -65.5)]
    # horn tones, lower pair then upper pair: f/Hz, relative level/dB
    horn_tones = [(2690, -2.5), (2748, -3.5), (3380, -8.5), (3435, -2)]
    hum_db, rumble_db, boom_db = curves(passing)
    hum_hz = 119.6 + 1.3 * walk(12)
    hum = np.sqrt(2) * np.sin(2 * np.pi * np.cumsum(hum_hz) / SR) * undb(hum_db)
    rumble = level(mode(rng.standard_normal(N), 90.4, 0.32).imag, -1.56) * undb(rumble_db)

    noise = rng.standard_normal(N)
    boom = 0
    for hz, width, db in boom_modes:
        t60 = np.log(1000) / np.pi / width  # a wider resonance fades sooner
        boom = boom + level(mode(noise, hz, t60).imag, db)
    boom = level(boom, -2.1) * undb(boom_db)

    # loudness and phase wander, making the tones rough
    lead = np.array([[.6], [-.6]])
    tones = []
    for hz, db in horn_tones:
        gain = undb(db + 2.5 * walk(50) + 2.3 * walk(18)) * np.sqrt(2)
        tones.append(gain * np.sin(2 * np.pi * hz * T + 1.1 * walk(60) + lead))
    lower_db, upper_db = curves(horn_curve)
    horn = undb(lower_db) * (tones[0] + tones[1]) + undb(upper_db) * (tones[2] + tones[3])
    arrival = np.clip((T - passing[0][0]) / 0.09, 0, 1)
    return arrival * (hum + rumble + boom + horn * pan(-2.5)[:, None])


def room(x):
    """Diffuse tail of the kitchen walls: decaying noise, different at each port."""
    t = T[:int(.4 * SR)]
    tail = rng.standard_normal((2, len(t))) * 1000. ** (-t / 0.25) * (t > .004)
    tail = tail * undb(-7.5) / np.sqrt(np.sum(tail[0] ** 2))
    return signal.oaconvolve(x, tail, axes=1)[:, :N]


def scene():
    """Tossing up to the cut, then the hand and the street; ticks run through both parts."""
    tossing = sliding() + landings() + knocks()
    before = np.clip((CUT_S - T) / 0.0028, 0, 1)
    small = ticks()
    bowl = before * (tossing + room(tossing))
    return bowl + small + room(small) + clink() + crumbs() + vehicle() + kitchen()


def record(dry):
    """The microphone loses deep bass, the ports differ in tone, peaks are rounded and the top is cut."""
    # left port against the mean of both: f/Hz, level/dB; the right port gets the opposite
    left_port = [(100, 0), (1000, 0), (9000, -1), (15000, 1)]
    right_port = [(hz, -db) for hz, db in left_port]
    thin = butter(dry, 2, 60, "high")
    thin = np.vstack([colour(thin[:1], left_port), colour(thin[1:], right_port)])
    rounded = np.tanh(1.1 * thin) / 1.1
    # the phone cuts steeply above 15900 Hz
    return signal.sosfilt(signal.ellip(12, .3, 100, 15900, fs=SR, output="sos"), rounded)


dry = scene()
out = record(dry)
inscribe(out)
```